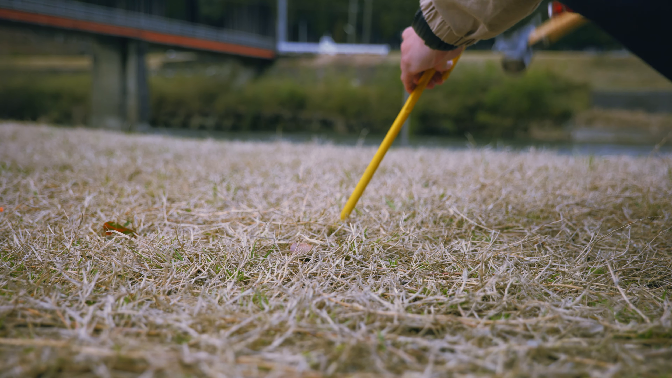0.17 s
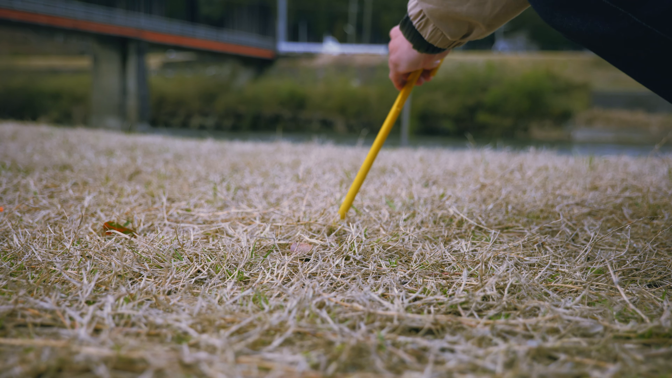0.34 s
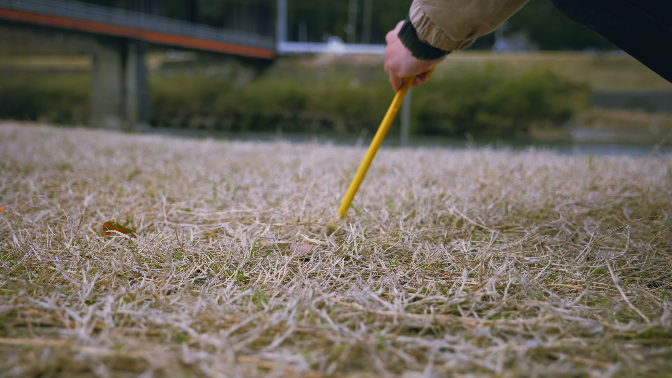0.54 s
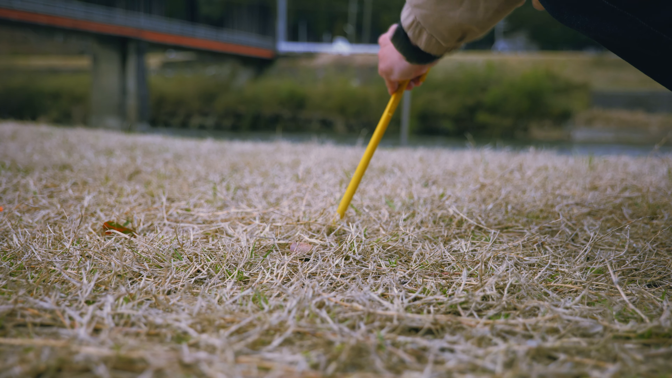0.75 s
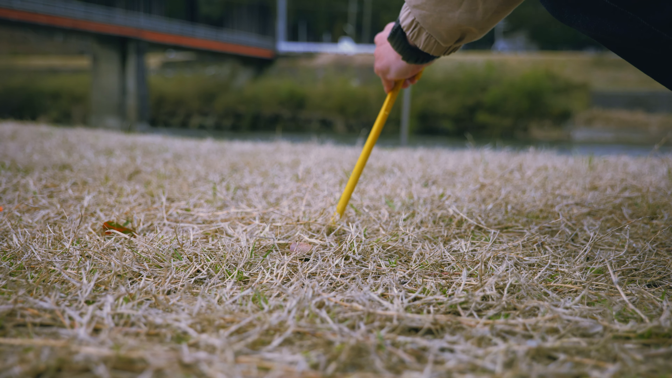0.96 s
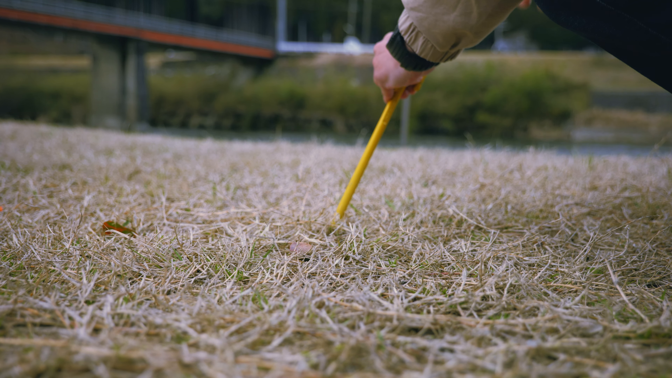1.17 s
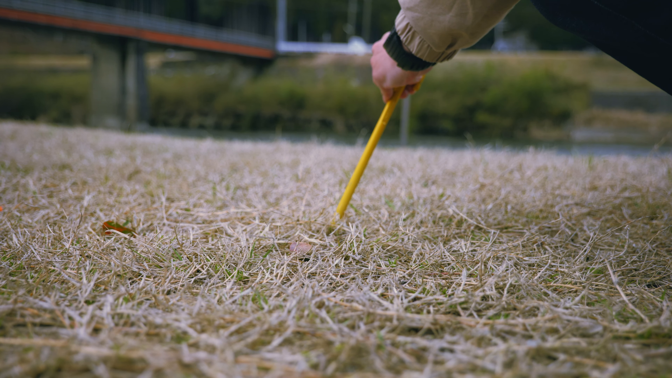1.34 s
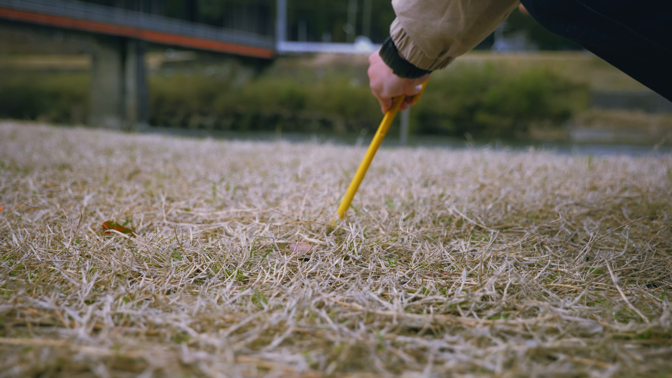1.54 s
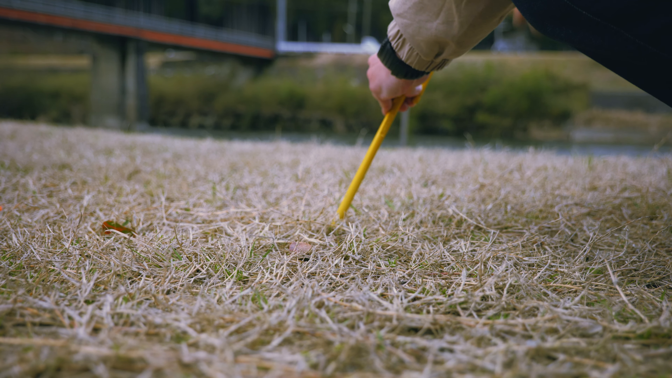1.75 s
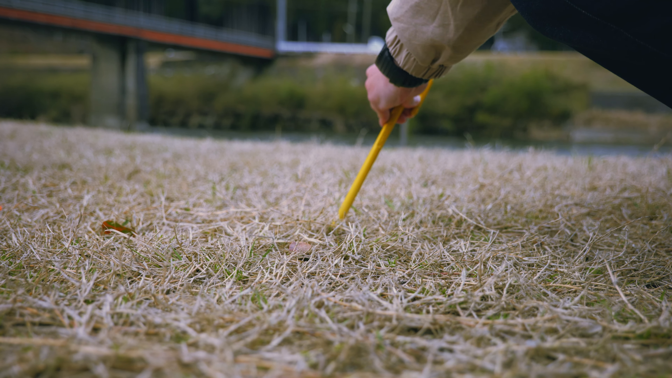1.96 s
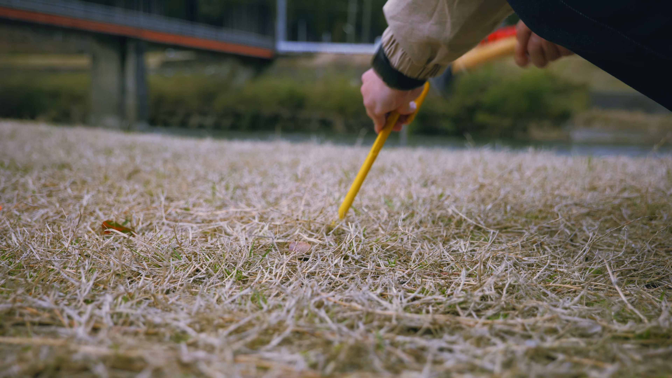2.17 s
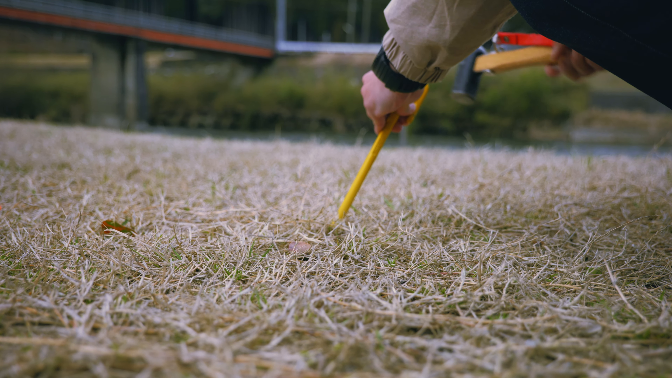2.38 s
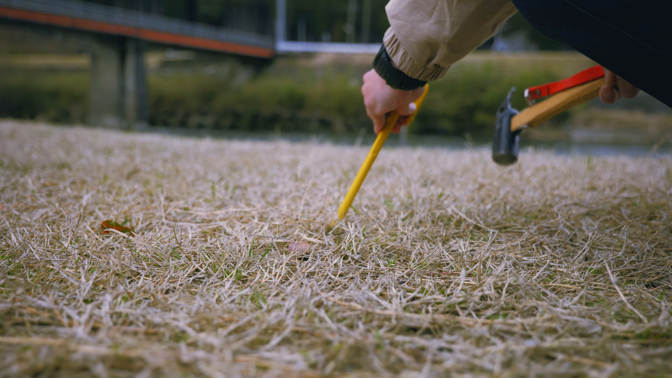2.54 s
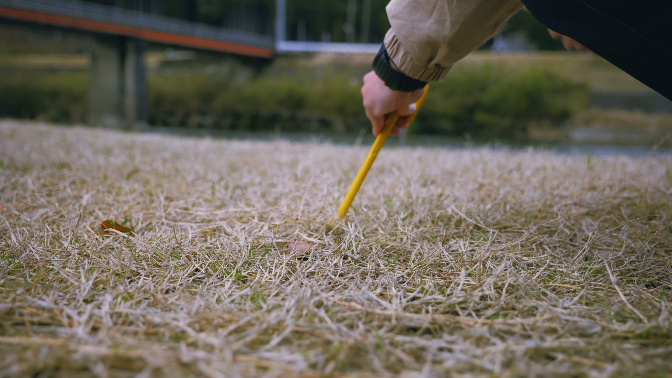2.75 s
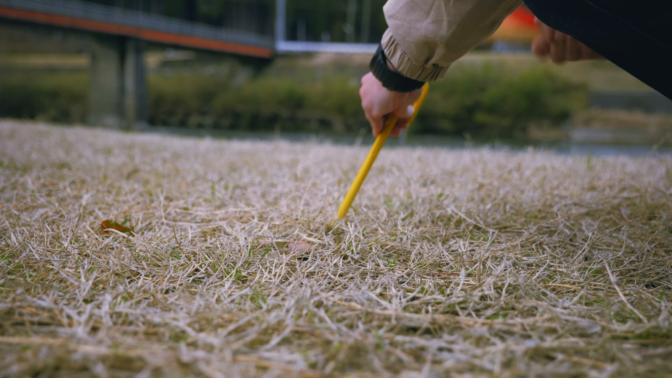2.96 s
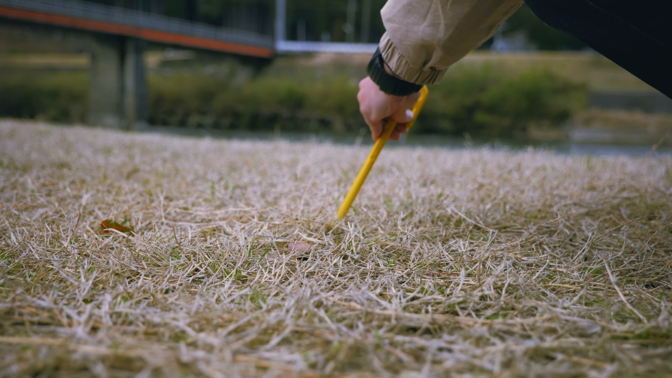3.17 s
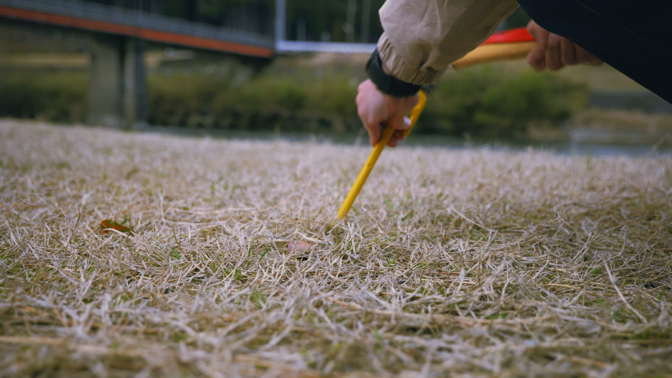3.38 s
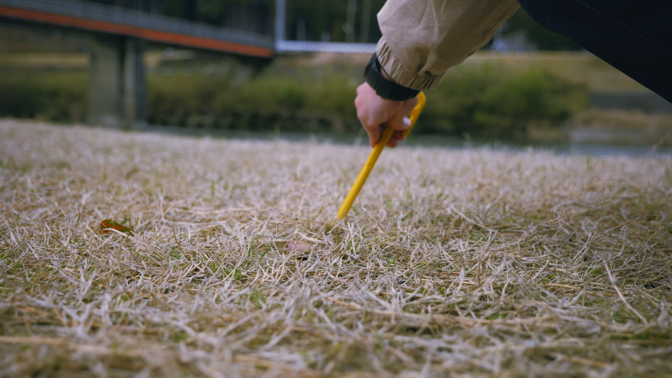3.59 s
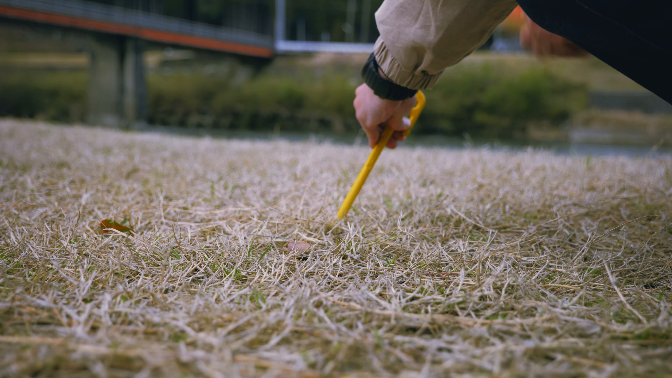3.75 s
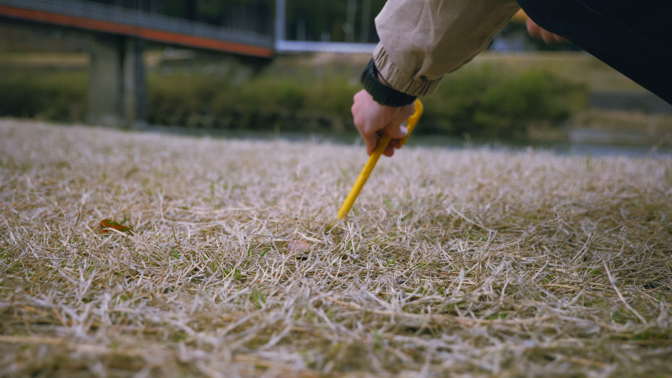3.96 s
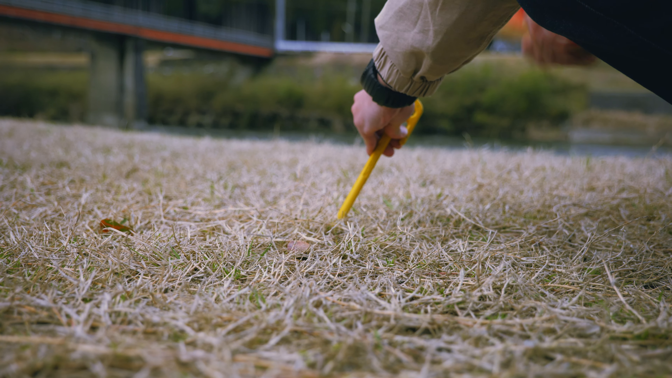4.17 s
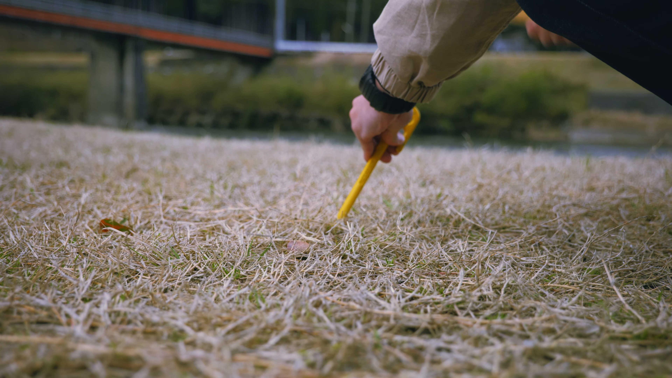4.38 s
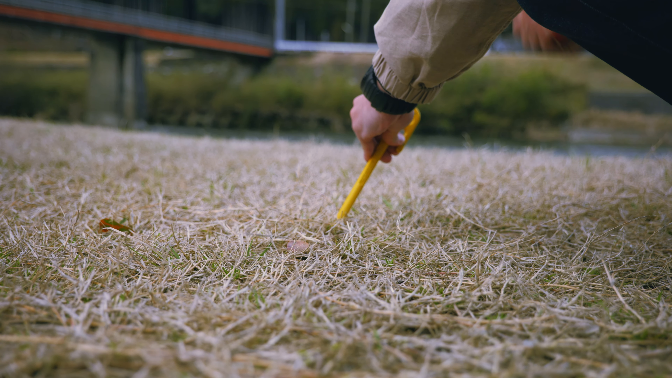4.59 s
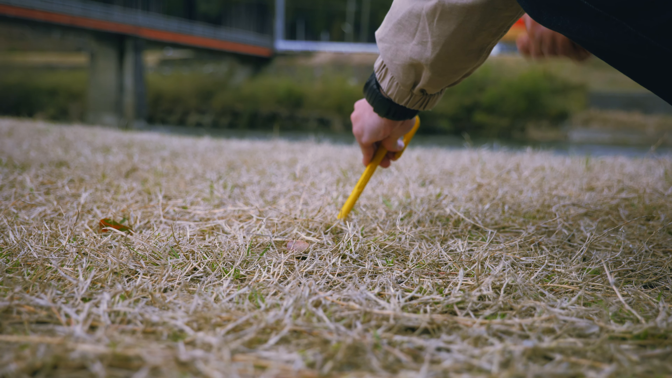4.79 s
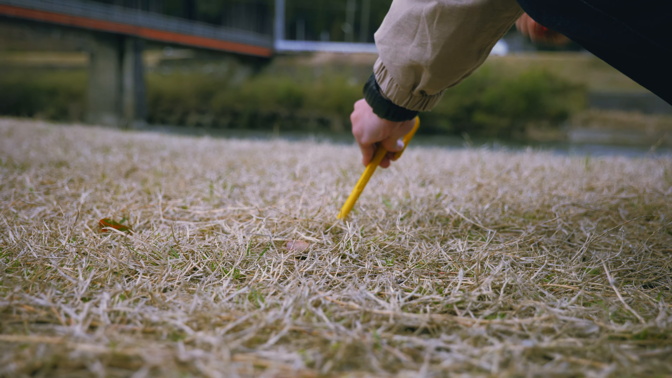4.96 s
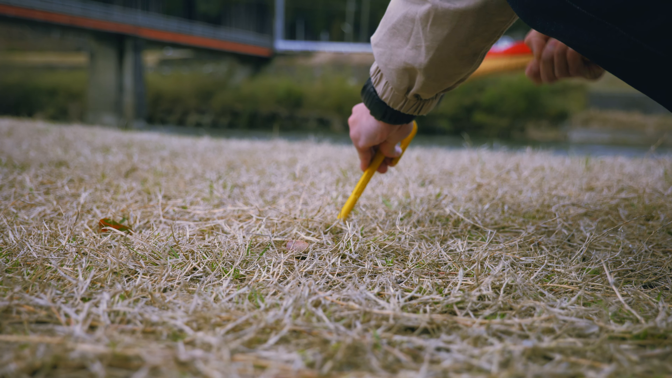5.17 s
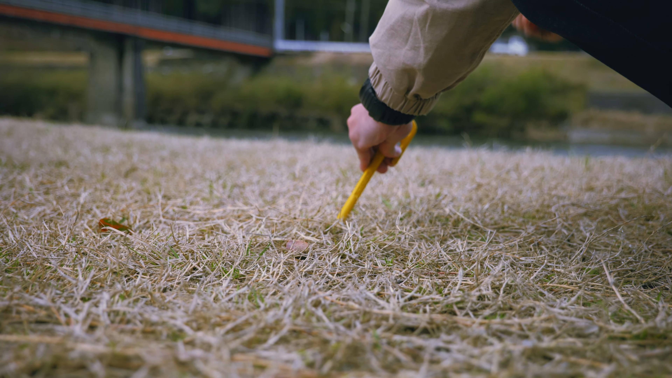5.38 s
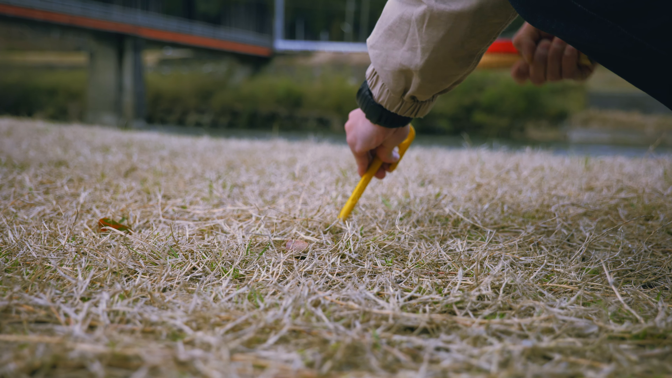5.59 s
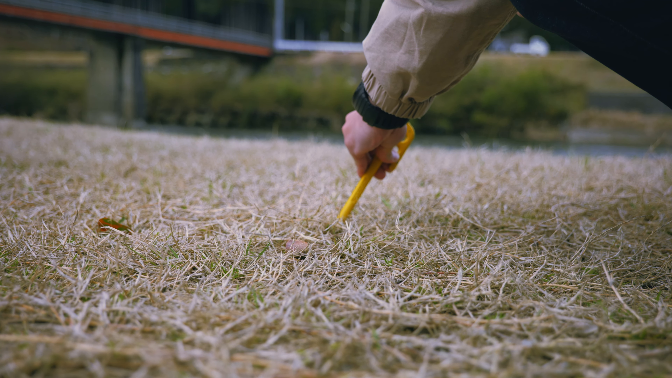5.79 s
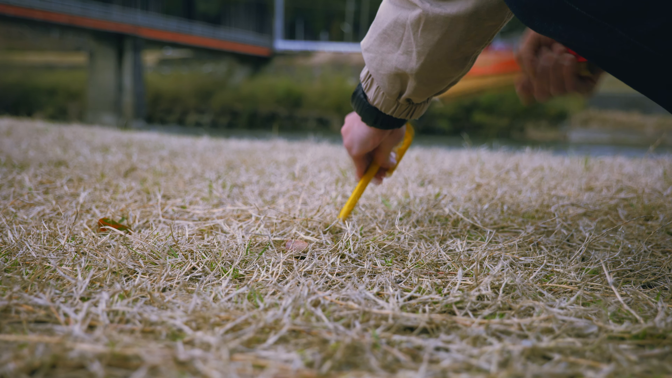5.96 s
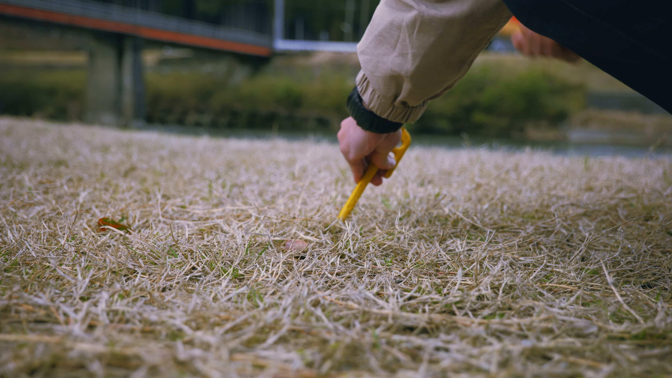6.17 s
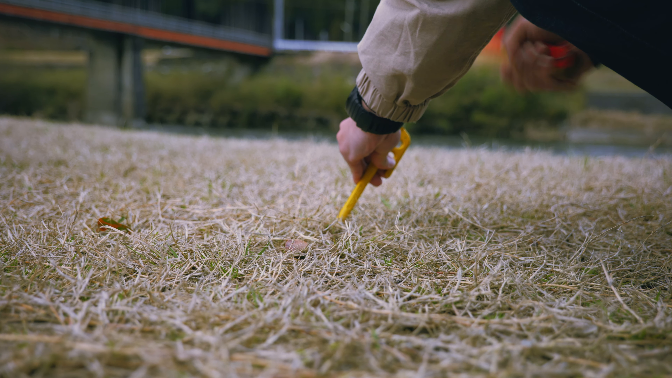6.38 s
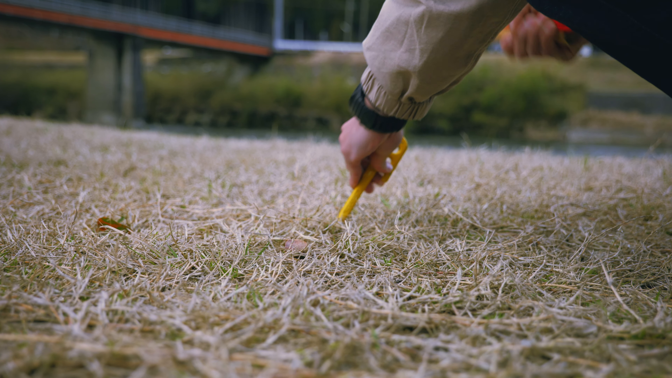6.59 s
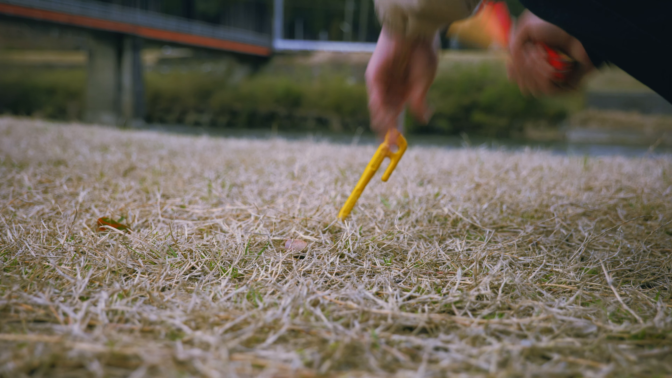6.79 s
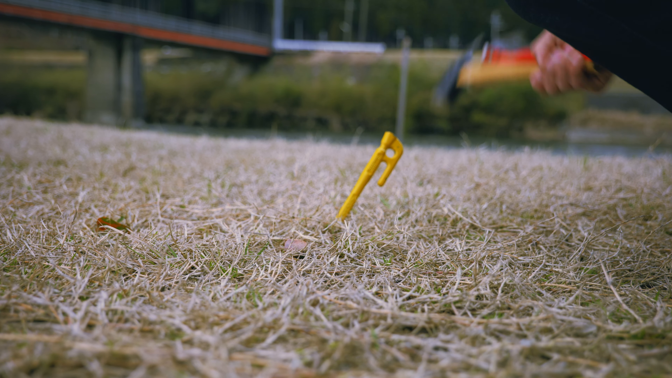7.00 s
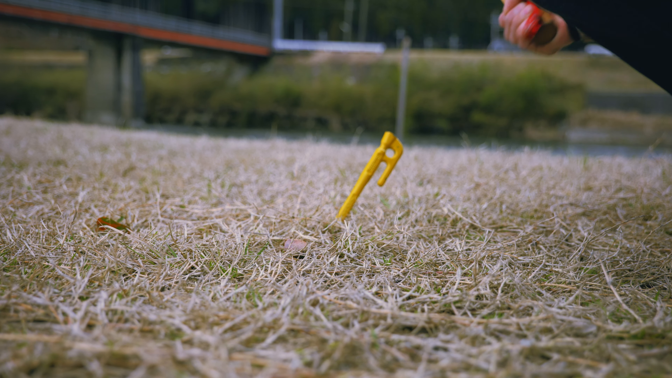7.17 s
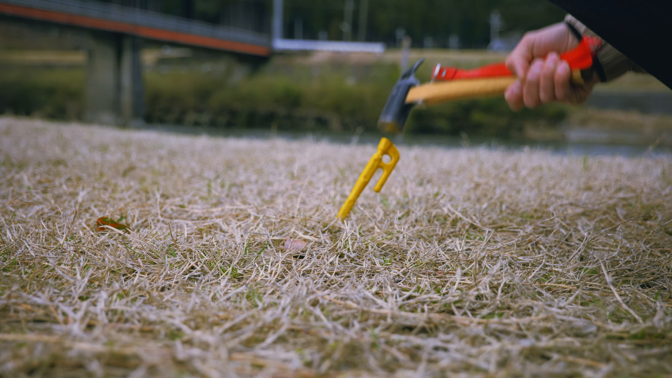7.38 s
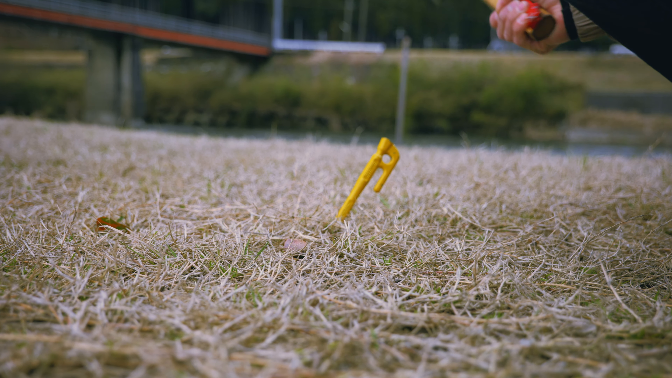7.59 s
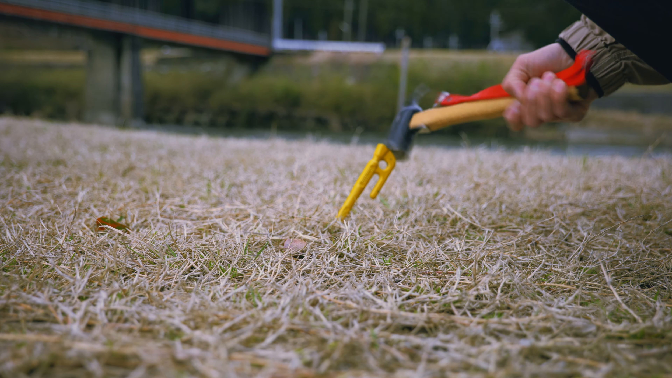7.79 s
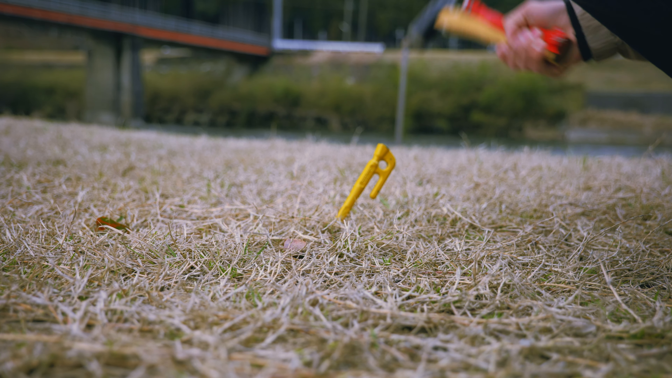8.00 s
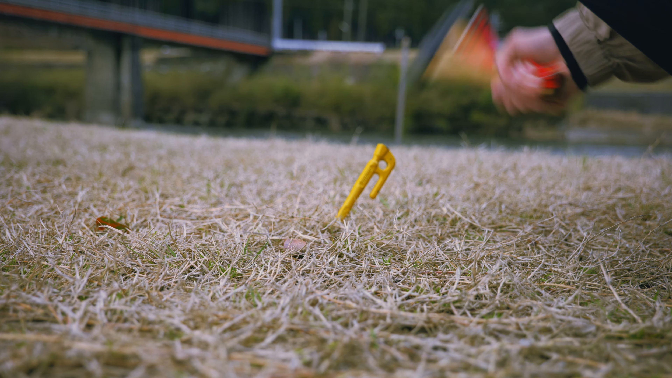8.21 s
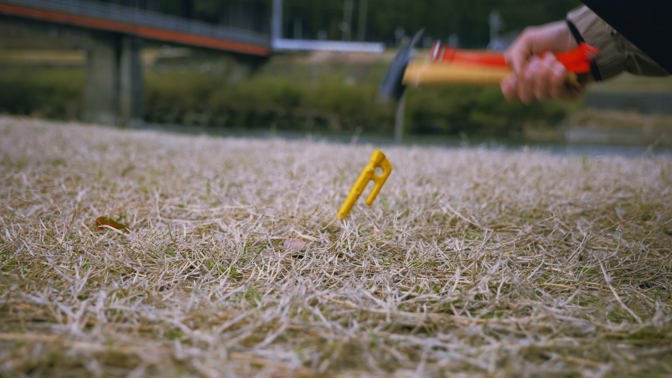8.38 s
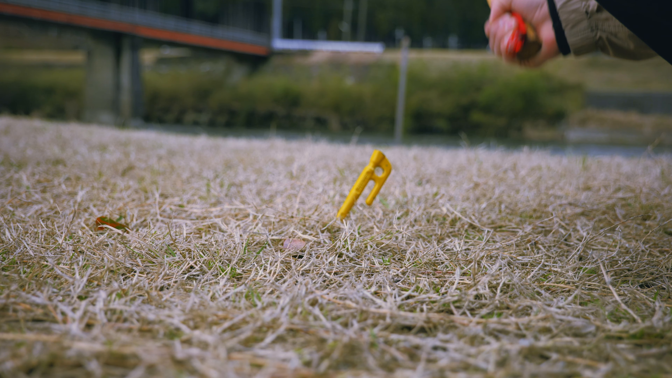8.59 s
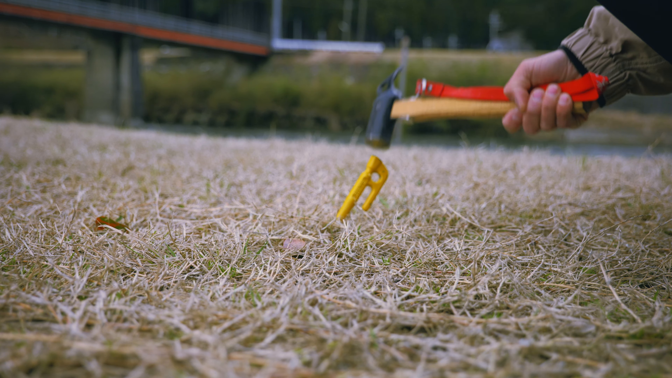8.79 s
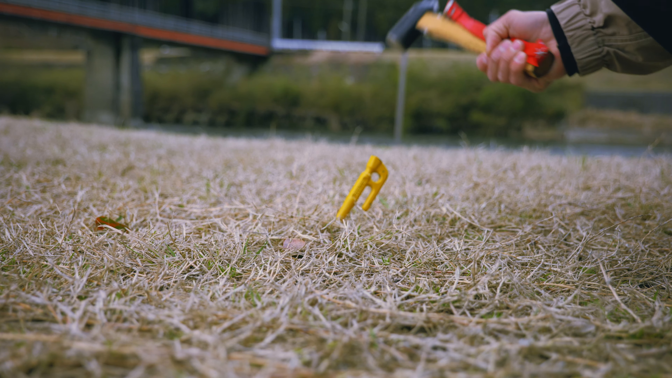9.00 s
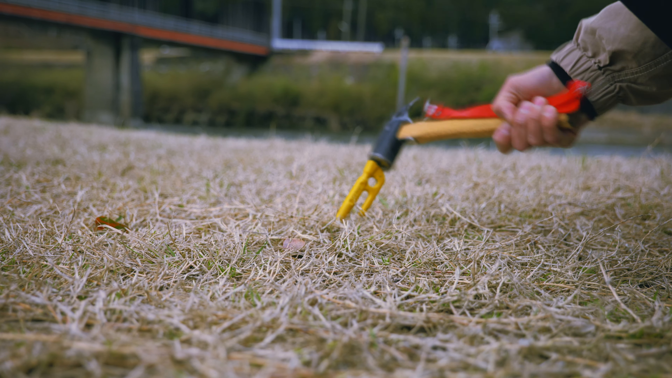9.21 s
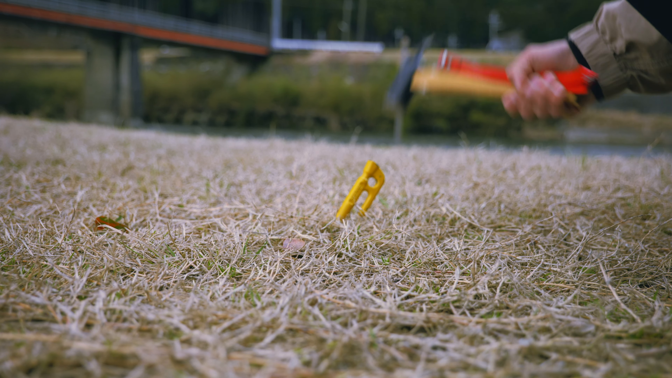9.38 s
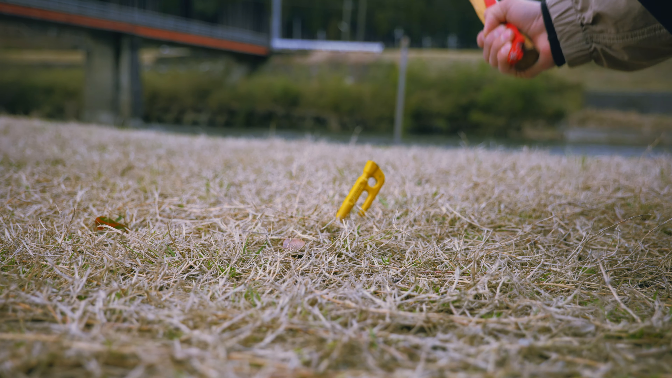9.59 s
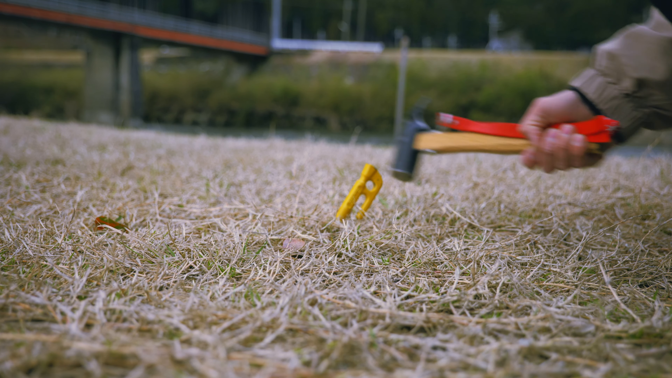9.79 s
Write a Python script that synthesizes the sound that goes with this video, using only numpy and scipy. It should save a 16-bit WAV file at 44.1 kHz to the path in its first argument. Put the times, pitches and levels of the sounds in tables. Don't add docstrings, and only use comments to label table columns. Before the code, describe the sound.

Close outdoor capture of a stake being hammered into dry grass. A burst of dry creaks comes first, then twenty-one bright steel blows, with a longer gap after the fifth. Each stutters in fast shrinking rebounds, rings high and returns a faint echo. Small ticks, finger rattles and grass snaps sit between blows; low wind and a soft river murmur lie beneath, fading as the level settles.

```python
import sys
import numpy as np
from scipy import signal
from scipy.fft import rfft, irfft
from scipy.io import wavfile
from scipy.ndimage import uniform_filter1d

SR = 44100
rng = np.random.default_rng(int(sys.argv[2]) if len(sys.argv) > 2 else 0)


def magnitude_from_level(level_db):
    exponent = np.asarray(level_db, float) / 20
    return 10 ** exponent


def wav_record(signal):
    frames = np.transpose(np.atleast_2d(signal))
    bounded = np.clip(frames, -1, 1)
    quanta = np.round(bounded * 32767).astype(np.int16)
    wavfile.write(sys.argv[1], SR, quanta)


N = 434385

# (time [s], knock [dB], first rebound [dB], loss with each further rebound [dB], stake clang [dB])
BLOWS = [(0.7675, 8, -9.5, 6, 1), (1.0971, 4.5, -7, 3.5, 2), (1.4448, 6, -4, 2.5, 3),
         (1.815, 9.5, -9.5, 4, 5.5), (2.1884, 6, -2, 7, -0.5), (3.0157, 5, -5.5, 9, -0.5),
         (3.4101, 4, -1, 8.5, -2.5), (3.827, 4.5, 3, 8.5, -5), (4.2435, 2.5, -5, 8, -3),
         (4.6914, 0, -8, 11.5, 0.5), (5.1127, 3, -15, 7.5, 3), (5.5463, 4, -11, 11, 3),
         (6.0127, 0, -13, 10, 1.5), (6.4505, 5, -11.5, 5, 2), (6.886, 1, -3, 11.5, -11),
         (7.3495, 4, -4.5, 11, -10.5), (7.8233, 5, -8, 7.5, -16.5), (8.2915, 5.5, -4.5, 9.5, -11),
         (8.7623, 3.5, -4, 5.5, -10), (9.2576, 2.5, -5, 4.5, -10), (9.7878, 7.5, -7, 8.5, -13)]
# (time [s], level [dB])
RIVER_LEVEL = [(0, -37.5), (.4, -37.5), (.72, -40.5), (1.05, -36), (1.8, -39), (2.4, -46.5), (2.8, -44.5),
               (3.4, -45.5), (4.2, -48.5), (5.5, -52), (6.4, -53.5), (7.3, -55), (8.7, -53), (9.85, -51)]


def unit(x):
    return x / np.sqrt(np.mean(x ** 2) + 1e-20)


def along(points, hz):
    f, v = np.transpose(points)
    return np.interp(np.log(hz + 1), np.log(f + 1), v)


def curve(rows):
    return np.interp(np.arange(N) / SR, *np.transpose(rows))


def add(track, s, sound):
    start = round(s * SR)
    track[start:start + len(sound)] += sound[:len(track) - start]


def band(x, low_hz, high_hz):
    edges = [low_hz, min(high_hz, SR / 2.1)]
    return signal.sosfilt(signal.butter(2, edges, "band", fs=SR, output="sos"), x)


def ring(t, hz, db, t60, phase=0, rise=0.0003):
    return magnitude_from_level(db - 60 * t / t60) * (1 - np.exp(-t / rise)) * np.sin(2 * np.pi * hz * t + phase)


def rush(spectrum, patchy_db, wide_bins, long_frames):
    hz, _, z = signal.stft(rng.standard_normal(N + 512), SR, nperseg=512)
    patches = uniform_filter1d(rng.standard_normal(z.shape), wide_bins, 0)
    patches = uniform_filter1d(patches, long_frames, 1)
    x = signal.istft(z * magnitude_from_level(patchy_db * unit(patches)), SR, nperseg=512)[1][:N]
    colour = magnitude_from_level(along(spectrum, np.fft.rfftfreq(N, 1 / SR)))
    return unit(irfft(rfft(x) * colour, N))


def hammer(count=5):
    first_hops = [10.3, 8.7, 7.7, 7.7, 6.2, 5.5, 6, 6, 5.8, 4.6, 4.8, 4.5, 4.9, 4.5, 4.7, 4.8, 4.2, 4.3, 4,
                  3.8, 3.2]
    # (clank [Hz], thud in the turf [dB], loose rattle [dB])
    landings = [(1890, -51, -36.5), (2250, -42, -21), (2110, -37.5, -18.5), (2300, -31.5, -27.5),
                (2200, -29.5, -22.5), (2400, -34.5, -39), (2350, -31.5, -26), (2280, -30.5, -25.5),
                (2364, -33, -27.5), (2250, -37, -27), (2261, -33, -30), (2300, -38.5, -40.5),
                (2400, -34, -27), (2150, -33.5, -41.5), (2300, -26.5, -35), (2126, -38, -38.5),
                (2280, -28, -22.5), (2280, -33, -35.5), (2300, -32.5, -32.5), (2300, -30, -23.5),
                (2400, -33, -31)]
    # (main clank [dB], upper knock [dB], low clank [dB], stake overtone [dB],
    # clang of the rebounds [dB])
    colours = [(1, -5.5, -33.5, -4.5, -2.5), (4.5, -4, -30.5, 3, -5.5), (2.5, -1.5, -28.5, -8, -3.5),
               (4.5, -1, -24.5, -4, -0.5), (0.5, 0.13, -20, -9.5, -4), (2, 2.14, -23.5, -3.5, -1),
               (2.5, 0.4, -20, -3, -3), (-0.5, 0.56, -19.5, 0, -4.5), (3, -1.3, -20, -2.5, -4),
               (7, 1, -24, -1, -3.5), (3, -0.5, -25.5, -2.5, -3.5), (6.5, -2.24, -23, -4.5, -1),
               (5, -0.97, -26, -2, -1), (3.5, 0, -22, -4.5, -4.5), (-1.5, 2, -22, -6, -3),
               (0, 0.55, -22, -8, -0.5), (1.5, 2.5, -23, -4.5, 0.5), (-1.15, 1.66, -21.5, -3, -1),
               (-2, 3.14, -18, -8.5, -3), (1, 4, -18, -7, -2.5), (-3, 2, -26.5, -6, -2)]
    # (low ring [dB], its t60 [s], high ring [dB], its t60 [s], neck ring [dB])
    heads = [(-18.5, 0.15, -48.5, .29, -28.5), (-12, 0.13, -16.5, 0.44, -23.5),
             (-6, 0.19, -26.5, 0.38, -37), (-15, 0.2, -17.5, 0.19, -27), (-32.5, 0.36, -34.5, 0.27, -20),
             (-27, 0.61, -31.5, 0.54, -59.5), (-4.5, 0.12, -29, .4, -40), (-16, .13, -35.5, 0.55, -26.5),
             (-27.5, 0.28, -31, 0.24, -59.5), (-19.5, .069, -44, 0.48, -39.5), (-29, .13, -33, 0.34, -43.5),
             (-29.5, 0.17, -44.5, .45, -52), (-26, 0.24, -53, .31, -61.5), (-37.5, 0.26, -44, 0.38, -61.5),
             (-24, .23, -42, 0.4, -61.5), (-26.5, 0.36, -35.5, 0.58, -57), (-12, 0.24, -31, 0.49, -53),
             (-23.5, .3, -36, .23, -53.5), (-26, 0.53, -19.5, 0.041, -50),
             (-12.5, 0.42, -30.5, 0.16, -48.5), (-13.5, 0.29, -33.5, .53, -59)]
    # (low ring rise [ms], early partner over it [dB], its t60 [ms],
    # high ring rise [ms])
    swells = [(4.9, 0.5, 18, 9), (3, 4, 19, 4.3), (5.5, 2.5, 19, 6), (3.3, 3.5, 25, 7.9), (3.8, 2.5, 28, 9),
              (3.8, 2, 28, 9), (16, -6.5, 28, 22), (4.7, 2.5, 28, 9), (3.8, 1.5, 28, 9), (4.2, 2.5, 28, 9),
              (3.8, 4.5, 26, 9), (3.8, 1, 28, 9), (3.8, 4, 28, 7.7), (3.8, 3, 28, 9), (3, 6.5, 40, 4),
              (3.8, 2, 28, 9), (3, 0, 28, 9), (3.8, 3, 28, 9), (3, 3, 28, 9), (1.6, 4.5, 23, 6),
              (2.3, 10, 70, 3)]
    # (partner under it [dB], time of a lull [ms])
    beats = [(13, 100), (12.5, 97), (11.5, 100), (9, 79), (11, 100), (11, 100), (7.5, 130), (4, 160),
             (0, 103), (3.5, 90), (5.5, 110), (13, 100), (6.5, 100), (17, 100), (11, 110), (12, 120),
             (13, 100), (11, 100), (12.5, 79), (12.5, 68), (12, 78)]
    hook_hums = [-28.5, -29.5, -28.5, -28.5, -27.5, -28.5, -28, -30, -26.5, -25.5, -27.5, -29, -29.5, -29,
                 -22, -23.5, -24.5, -23, -21, -17, -23.5]
    # (upper [Hz], level over the main one [dB], t60 of both [ms], low clank [Hz])
    pairs = [(3270, -3.5, 2.7, 900), (2830, -3.5, 5, 330), (2940, -1.5, 3.5, 900), (3240, -3, 3.2, 900),
             (3300, -1, 3, 950), (3300, -2.5, 2.6, 900), (3410, -2.5, 4.5, 950), (3400, -2.5, 2.2, 900),
             (3400, -3, 4, 1000), (3300, -2, 1.9, 900), (3400, -1, 3.3, 900), (3300, -2, 1.4, 900),
             (3400, 0, 3.4, 810), (3300, -0.5, 1.8, 990), (3400, 1, 4.3, 950), (3400, -2, 3.1, 850),
             (3400, 3.5, 3.3, 950), (3400, 0.5, 2.9, 900), (3500, 0.5, 4, 900), (3500, 1, 4, 950),
             (3500, 3.5, 1.7, 890)]
    fills = [-9, -9, -14, -16, -18, -14, -18, -16, -18, -20, -22, -18, -16, -18, -20, -22, -18, -22, -20,
             -24, -18]
    # (frequency ratio, level [dB], t60 [s])
    stake_modes = [(1, 6.5, .013), (0.97, -19.5, .03), (1.022, -9, .03)]
    # (mode [Hz], level [dB], t60 [s])
    hook_modes = [(5280, -5.5, 0.079), (2300, -2.5, 0.032), (3530, -2, 0.031), (5700, -7, 0.029),
                  (8400, -10.5, 0.035), (1089, -4, 0.041), (7250, -10.5, .03), (10950, -9, 0.032)]
    shrink, free_hop_ms = 0.56, 6.5
    steel, far = np.zeros(N), np.zeros(N)
    t = np.arange(SR // 2) / SR
    short = t[:SR // 20]
    per_blow = zip(BLOWS, first_hops, landings, colours, heads, swells, beats, hook_hums, pairs, fills)
    for blow, hop_ms, landing, colour, head, swell, beat, hook_db, pair, fill_db in per_blow:
        s, knock_db, rebound_db, loss_db, stake_db = blow
        main_hz, thud_db, rattle_db = landing
        main_db, upper_db, low_db, overtone_db, rebound_clang_db = colour
        chance = rng.standard_normal((count, len(hook_modes) + 1, 2))
        grit = rng.standard_normal((count, len(short)))
        phase = rng.uniform(0, 2 * np.pi, count)
        clank = (knock_db, thud_db, low_db, main_hz, main_db, upper_db, rattle_db, fill_db, pair)
        stake_hz = 5843 - 9 * stake_db + 9.0 * (hop_ms - free_hop_ms)
        longer = np.sqrt(hop_ms / free_hop_ms)
        lands = s + hop_ms / 1000 * (1 - shrink ** np.arange(count + 1)) / (1 - shrink)
        for k in range(count):
            rebound = k > 0
            force_db = rebound_db - loss_db * (k - 1) if rebound else 7
            clang = sum(ring(short, stake_hz * ratio, stake_db + db, t60 * longer, phase[k], rise=0.00059)
                        for ratio, db, t60 in stake_modes)
            clang -= ring(short, stake_hz * 1.245, stake_db + overtone_db, 0.012, phase[k], rise=0.0006)
            choked_s = np.clip(short - (lands[k + 1] - lands[k]), 0, 1)
            clang = clang * magnitude_from_level(-60 * choked_s / 0.00089)
            touch = contact(short, clank, chance[k] * rebound, grit[k], dull_db=3.3 * rebound)
            clang_db = force_db + rebound_clang_db if rebound else 3
            add(steel, lands[k], magnitude_from_level(force_db) * touch + magnitude_from_level(clang_db) * clang)
            far_db = force_db - 3.0 if rebound else 3
            add(far, lands[k], magnitude_from_level(far_db - stake_db) * clang)
        add(steel, s, head_ring(t, head, swell, beat))
        add(steel, s, sum(ring(t, hz, hook_db + db + 2.2 * vary, t60, rise=0.003)
                          for (hz, db, t60), vary in zip(hook_modes, chance[0, :, 0])))
    return band(steel, 240, 22000), far


def contact(t, clank, chance, grit, dull_db):
    # (mode [Hz], level [dB], t60 [s])
    knock_modes = [(4780, -7, 0.005), (8500, -19, .004), (10100, -18.5, 0.0015)]
    knock_db, thud_db, low_db, main_hz, main_db, upper_db, rattle_db, fill_db, pair = clank
    pair_hz, pair_db, pair_ms, low_hz = pair
    modes = [(235, thud_db + 9.5, 0.02),
             (low_hz, low_db + 2.5, 0.009),
             (main_hz, main_db + 3.0, pair_ms / 1000),
             (pair_hz, main_db + 4.0 + pair_db, pair_ms / 1000)]
    modes += [(hz, db + upper_db, t60) for hz, db, t60 in knock_modes]
    signs = [1, 1, 1, -1, 1, 1, 1]
    knock = sum(sign * ring(t, hz * (1 + a / 60), db + b - dull_db * hz / 10000, t60, rise=0.00015)
                for (hz, db, t60), (a, b), sign in zip(modes, chance, signs))
    after_s = 0.012
    linger = ring(t, main_hz, 0, after_s, rise=0.0026) - ring(t, pair_hz * 0.94, -1.9, after_s, rise=0.0021)
    knock += magnitude_from_level(main_db - 20) * linger
    knock -= ring(t, 1550, fill_db, 0.003, rise=0.00016)
    knock -= ring(t, 700, low_db + 4.5, 0.0036)
    loose = magnitude_from_level(rattle_db - 9.5 - 60 * (t / 0.066) ** 2) * unit(grit[::-1] ** 5)
    knock += band(loose, 390, 5300) + magnitude_from_level(-10.5 - 60 * t / 0.11) * band(loose, 4900, 16000)
    crack = magnitude_from_level(-7.5 - dull_db - 60 * t / 0.008) * (1 - np.exp(-t / 0.00034)) * grit
    return magnitude_from_level(knock_db) * (knock + band(crack, 1000, 8100))


def head_ring(t, head, swell, beat):
    head_hz = (4152, 10253, 1476)
    # (mode [Hz], level [dB], t60 [s])
    top_modes = [(13100, -8.5, .04), (14100, -9, .06), (8500, -13, .1)]
    low_hz, high_hz, neck_hz = head_hz
    low_db, low_t60, high_db, high_t60, neck_db = head
    low_ms, early_db, early_ms, high_ms = swell
    partner_db, lull_ms = beat
    beat_hz = 12
    low = ring(t, low_hz, low_db + 1.5, low_t60, rise=low_ms / 1000)
    low += ring(t, low_hz + 13, low_db + early_db + 0.5, early_ms / 1000, rise=0.003)
    high = ring(t, high_hz, high_db + 4, high_t60, rise=high_ms / 1000)
    lull_phase = -2 * np.pi * beat_hz * lull_ms / 1000
    high -= ring(t, high_hz + beat_hz, high_db + 3.0 - partner_db, high_t60, lull_phase, rise=0.0066)
    high += sum(ring(t, hz, high_db + db, t60, rise=0.004) for hz, db, t60 in top_modes)
    neck = ring(t, neck_hz, neck_db + 4.0, 0.17, rise=0.021)
    return magnitude_from_level(-300 * t * t) * (magnitude_from_level(-250 * t * t) * low + high + neck)


def valley(clang, steel):
    # (delay [s], level [dB])
    echoes = [(.035, -29), (.04, -33.5), (.047, -36), (.066, -37), (0.072, -39), (.1, -52), (.13, -50),
              (.245, -54)]
    # (frequency [Hz], t60 [s])
    tail_t60 = [(500, .3), (3000, .5), (6000, 0.95), (12000, .7)]
    hz, t, z = signal.stft(rng.standard_normal(SR * 3 // 4), SR, nperseg=256)
    tail = signal.istft(z * magnitude_from_level(-60 * t / along(tail_t60, hz)[:, None]), SR, nperseg=256)[1]
    tail = magnitude_from_level(-43) * np.pad(tail / np.linalg.norm(tail), (SR // 40, 0))
    for s, db in echoes:
        tail[round(s * SR)] += magnitude_from_level(db)
    first_s, first_db = echoes[0]
    bright = magnitude_from_level(first_db - 9.5) * np.roll(band(steel, 6500, 15000), round(first_s * SR))
    carried = band(clang, 5550, 6150) + magnitude_from_level(-7) * band(clang, 7000, 7500)
    return bright + signal.fftconvolve(carried, tail)[:N]


def strap():
    # (time [s], peak [dB], low knock [dB])
    creaks = [(0.136, -15.5, -8), (.1665, -9.5, -22), (0.176, -28.5, -10), (.196, -3.5, -37.5),
              (0.2, -11.5, -30), (0.2169, -9, -3), (0.2334, -2.5, -9), (0.249, -7, -22), (0.2639, -3, -16),
              (0.2786, -6, -6), (0.292, -8.5, 0.5), (0.3071, -5, -4), (0.3158, -29.5, -11), (0.327, -6, 3),
              (0.3545, -2, 2.5), (0.379, -18, -0.5), (0.4807, -21, -21), (.4908, -22, -17),
              (0.4962, -19, -18), (0.2348, -10.5, -19), (0.267, -21.5, -22), (0.2939, -11.5, -3)]
    # (time [s], peak [dB], bright
    # click [dB])
    ticks = [(1.0354, -36, -31), (1.665, -33.5, -9.5), (1.726, -32, -11), (1.935, -46, -2),
             (2.0091, -19.5, -32), (2.4394, -41, -11), (2.9092, -32.5, -16.5), (2.9318, -23.5, -17),
             (3.527, -24.5, -18), (3.7353, -24.5, -33), (4.132, -24.5, -20.5), (4.416, -25, -30),
             (4.5072, -26, -36), (5.2435, -33, -22), (5.3732, -28, -26), (5.6819, -31.5, -19.5),
             (5.7387, -34.5, -20), (8.5015, -38.5, -16.5), (8.6115, -36, -16), (8.6587, -36, -13),
             (8.669, -38.5, -17), (8.707, -50, -7), (8.947, -39, -11.5), (9.0205, -43, -10),
             (9.096, -32, -28.5), (9.11, -44, -10.5), (9.3646, -35, -15), (9.4451, -27, -31),
             (9.532, -33, -14), (9.6091, -42.5, -30), (9.7487, -26.5, -32),
             (3.7104, -52.5, -13), (4.712, -35.5, -11), (4.775, -31.5, -24.5), (4.796, -32.5, -19.5),
               (5.2155, -38.5, -13), (6.6383, -32.5, -21.5), (6.6684, -33.5, -14.5), (6.7725, -31.5, -19),
               (6.8044, -34, -24), (6.7952, -34, -21.5), (7.039, -33, -18), (7.124, -33.5, -23),
               (7.1362, -39.5, -15.5), (7.1558, -32.5, -12), (7.1776, -31, -14), (7.2058, -39.5, -8.5),
               (7.2186, -47, -10), (7.228, -47, -9), (7.238, -51, -9.5), (7.2514, -45, -11),
               (7.2977, -39, -12), (7.335, -31.5, -20.5), (8.8306, -49, -20)]
    # (mode [Hz], t60 [s])
    slip_modes = [(1150, 0.0039), (544, 0.006), (3237, 0.0033), (6382, 0.0015), (1874, 0.00049)]
    slip_signs = [1, 1, -1, 1, 1]
    clicks, t = np.zeros(N), np.arange(SR // 80) / SR
    slips = [(s, db, low_db, -23, -30) for s, db, low_db in creaks]
    slips += [(s, db, -9, bright_db, -24.5 - 0.43 * (db + 31.0)) for s, db, bright_db in ticks]
    scatter = rng.standard_normal((len(slips), 2, len(slip_modes)))
    for k, (slip, (detune, vary)) in enumerate(zip(slips, scatter)):
        s, db, low_db, bright_db, fizz_db = slip
        shares_db = np.array([3, low_db + 9.0, bright_db + 21.5, fizz_db + 20.5, bright_db + 29.0])
        if k >= len(creaks):
            shares_db += 3.5 * vary * [0, 1, 0, 1, 1]
        click = sum(sign * ring(t, hz * (1 + 0.076 * d), db + share_db, t60, rise=0.00029)
                    for (hz, t60), sign, share_db, d in zip(slip_modes, slip_signs, shares_db, detune))
        add(clicks, s + 0.00057, click)
    return -band(clicks, 570, 14000)


def snaps():
    # (time [s], level [dB], pitch [Hz], t60 [ms])
    snap_rows = [(1.8081, -25, 2300, 4.9), (1.848, -28, 2300, 6.8), (2.2349, -23.5, 2240, 9.9),
                 (2.2342, -31.5, 3090, 5.9), (4.266, -27.5, 2400, 8.04), (4.278, -35, 2920, 4.2),
                 (5.1511, -38.5, 2400, 10.16), (5.5793, -36.5, 2500, 4), (6.053, -39, 2500, 6),
                 (6.9013, -24, 2400, 5.4), (6.929, -28.5, 2500, 9), (7.8642, -26, 2114, 11),
                 (7.8638, -27.5, 3510, 8.8), (8.3337, -30, 2300, 9), (8.34, -40, 2400, 5),
                 (9.298, -31.5, 2400, 4.5), (9.838, -37, 3300, 6.6), (5.776, -51.5, 9000, 2.7),
                 (5.7797, -35, 6010, 2.63), (5.832, -40.5, 5980, 3.1), (5.835, -50, 9500, 2.29),
                 (5.9326, -41, 5500, 3), (5.9365, -45.5, 8500, 2.5), (8.7916, -22.5, 2200, 4.9),
                 (8.7927, -20.5, 796, 11), (8.805, -20, 3500, 8.3), (8.805, -29, 2250, 8),
                 (8.926, -50, 7040, 2.5), (9.275, -30, 2300, 12), (9.294, -35, 8000, 4.04),
                 (9.302, -25.5, 2350, 12), (9.301, -21, 3700, 9), (9.609, -50, 8000, 2.44),
                 (9.727, -48, 7020, 2.5), (9.806, -30, 2400, 9), (9.813, -34, 6100, 50),
                 (9.824, -36, 3400, 6), (9.828, -36, 2200, 5), (9.832, -25.5, 2240, 11),
                 (9.832, -22.5, 3700, 10), (9.832, -37, 1100, 7)]
    track, t = np.zeros(N), np.arange(SR // 20) / SR
    for s, db, hz, t60_ms in snap_rows:
        add(track, s, ring(t, hz, db, t60_ms / 1000, rise=0.00028))
    return track


def outdoors():
    # (time [s], level [dB])
    wind_level = [(0, -48), (.1, -55), (.2, -47), (.3, -68.5), (.4, -50), (.55, -56.5), (1.05, -58),
                  (1.64, -55), (2.1, -58.5), (2.5, -54.5), (3, -60), (4, -61.5), (4.5, -68.5), (4.9, -46),
                  (5.1, -47), (5.4, -57.5), (7.2, -61.5), (9.85, -59.5)]
    # (time [s], level [dB])
    moves = [(0, -43), (.2, -38.5), (.3, -35.5), (.4, -37), (.46, -46), (.55, -42), (.72, -53), (1.05, -51),
             (1.4, -53.5), (2, -56.5), (2.97, -57), (4, -60), (6.45, -67.5), (6.74, -59), (6.79, -52),
             (7.15, -50.5), (7.25, -65), (9.85, -72)]
    # (frequency [Hz], level per Hz [dB])
    buffet_colour = [(15, -29.5), (28, 8.5), (60, 14), (120, 7.5), (250, -47)]
    river_colour = [(70, -26.5), (170, -7), (300, -2), (550, -5), (1000, -17.5), (2500, -24.5),
                    (5000, -60.5)]
    drone_colour = [(95, -39), (118, 0), (135, 3), (165, -47)]
    rustle_colour = [(400, -18.5), (900, 0), (1400, -1), (2400, -6), (4300, -9.5), (6000, -16), (8500, -32)]
    hiss_colour = [(4000, -21.5), (6500, -3.5), (10000, -5), (16000, -9.5), (18000, -39)]
    wind_db, river_db, move_db = curve(wind_level), curve(RIVER_LEVEL), curve(moves)
    wind = magnitude_from_level(wind_db - 1.5) * rush(buffet_colour, patchy_db=1.2, wide_bins=2, long_frames=14)
    river = magnitude_from_level(river_db + 1.0) * rush(river_colour, patchy_db=2.5, wide_bins=3, long_frames=5)
    river += magnitude_from_level(river_db - 17.0) * rush(drone_colour, patchy_db=1.0, wide_bins=2, long_frames=20)
    rustle = np.hypot(magnitude_from_level(move_db + 1.0), magnitude_from_level(river_db - 9.0))
    rustle = rustle * rush(rustle_colour, patchy_db=1.5, wide_bins=20, long_frames=2)
    hiss = magnitude_from_level(-51 + move_db - move_db.max())
    hiss = hiss * rush(hiss_colour, patchy_db=5.0, wide_bins=40, long_frames=3)
    return wind + river + rustle + hiss


def scene():
    steel, far = hammer()
    slow_db = curve(RIVER_LEVEL)
    echoes = magnitude_from_level(6.5 + 1.6 * (slow_db - slow_db.max())) * valley(far, steel)
    return (steel + echoes + strap() + snaps() + outdoors())[None]


def band_limit(x):
    return signal.sosfilt(signal.butter(12, 15950, fs=SR, output="sos"), x)


def record(dry):
    extra_duck = [0.1, 0.119, 0.1, 0.079, 0.113, 1, 0.96, 0.93, 0.9, 0.913, 1, 0.99, 0.99, 1, 0.1, 0.1,
                  0.11, 0.1, 0.103, 0.1, 0.1]
    t, dip_db = np.arange(N) / SR, np.zeros(N)
    times = [row[0] for row in BLOWS]
    energy_db = np.array([10 * np.log10(np.mean(dry[0, round(s * SR):][:SR // 20] ** 2)) for s in times])
    slow_db = np.interp(times, *np.transpose(RIVER_LEVEL))
    depths_db = 10.5 + 0.5 * (energy_db - energy_db.mean())
    depths_db = depths_db + 0.53 * (slow_db - slow_db.mean()) + extra_duck
    for s, depth_db in zip(times, depths_db.clip(0)):
        since = np.clip(t - s, 0, 3)
        back = np.clip(since - 0.07, 0, 3)
        dip_db += depth_db * (1 - np.exp(-since / 0.023)) * 1.05 * np.exp(-back / 0.11)
    x = dry * magnitude_from_level(-dip_db)
    lost = x - x / (1 + np.abs(x / 0.96) ** 8) ** (1 / 8)
    no_thump = signal.butter(2, 70, "high", fs=SR, output="sos")
    return band_limit(x - signal.sosfiltfilt(no_thump, lost))


dry = scene()
out = record(dry)
wav_record(out)
```